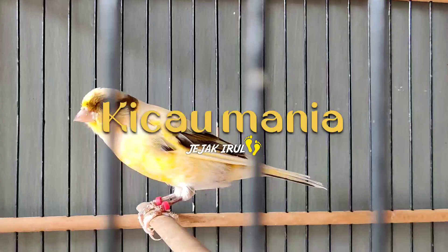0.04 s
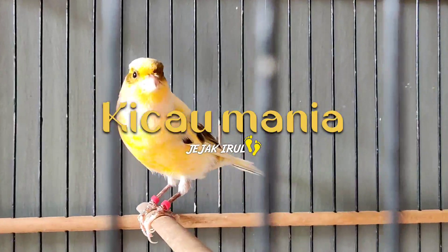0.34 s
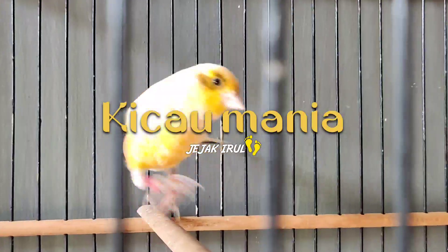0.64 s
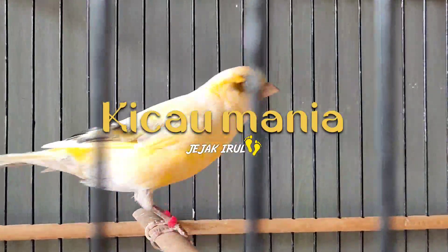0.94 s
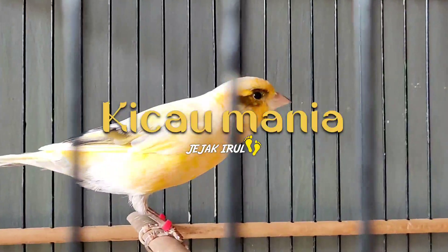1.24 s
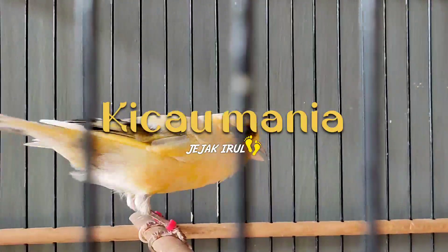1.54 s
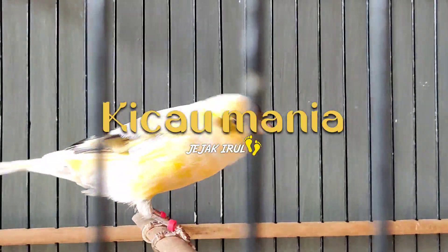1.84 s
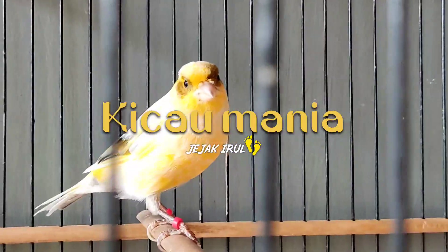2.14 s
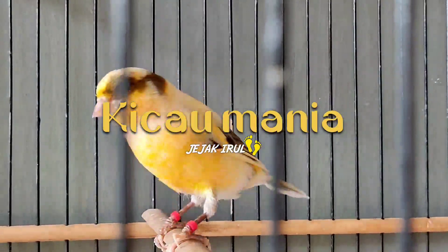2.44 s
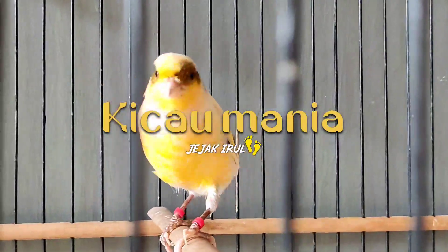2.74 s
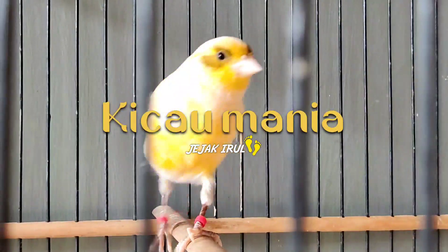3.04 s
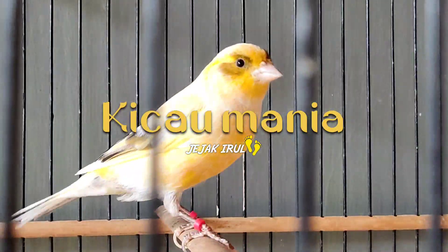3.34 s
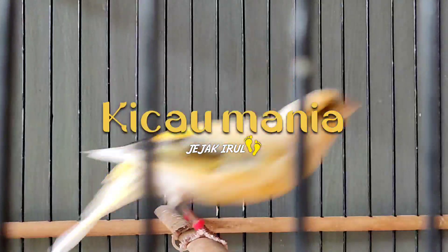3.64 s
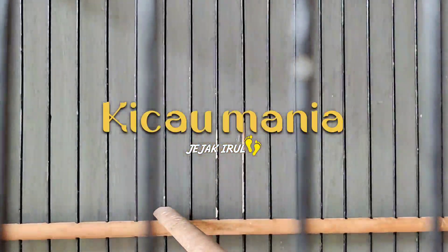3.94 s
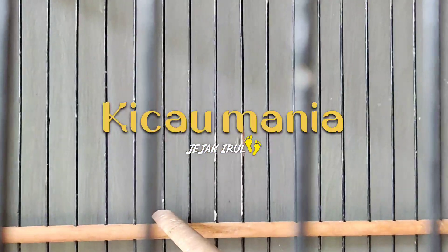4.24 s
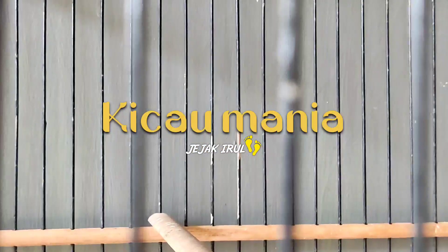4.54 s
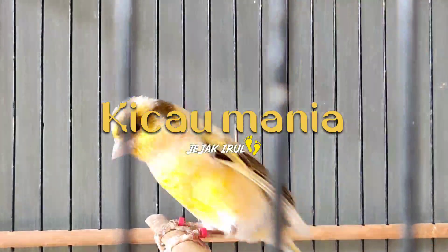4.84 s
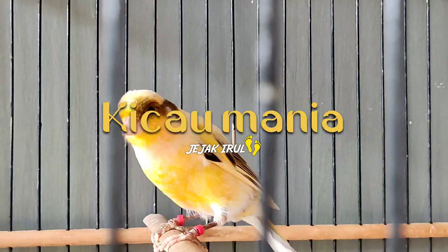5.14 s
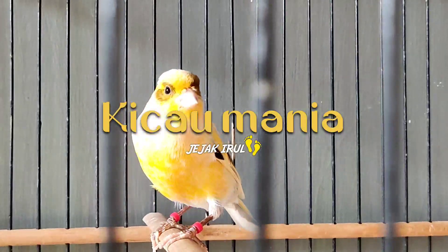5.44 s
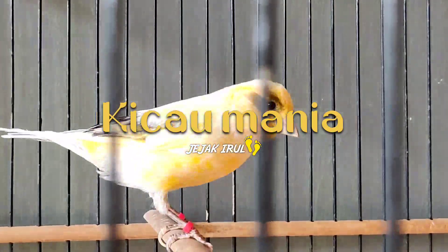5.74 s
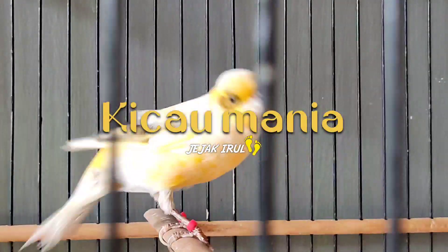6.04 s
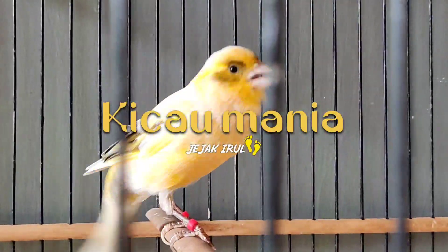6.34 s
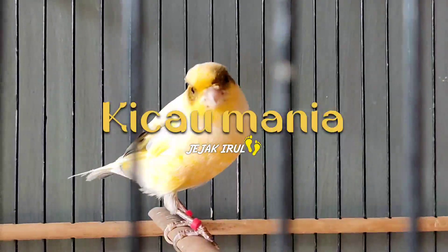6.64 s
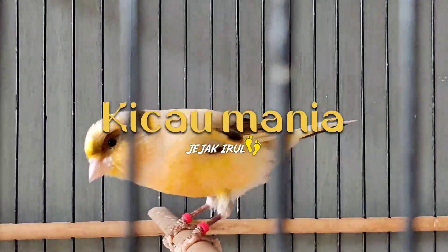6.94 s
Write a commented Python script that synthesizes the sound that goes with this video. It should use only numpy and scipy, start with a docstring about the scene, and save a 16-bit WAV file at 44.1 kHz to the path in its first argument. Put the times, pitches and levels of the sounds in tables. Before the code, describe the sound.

Two loud upward-sweeping canary calls, with feather rustles, claw ticks, wing flutters and soft chirps between, above a steady low throb.

```python
"""A low throb, rustling feathers and a bang across the room; then a caged canary, close to a two-port
microphone, gives two loud rising "sweet" calls, swept up an octave by the tightening membranes of its
syrinx. Between them it shuffles, claws ticking, flutters off its perch and back, and adds softer,
echoing short notes. Cage walls and the room answer. The throb is a machine, perhaps a pump, thudding
through about twelve turns a second under the room's hiss."""
import sys
import numpy as np
from scipy import signal
from scipy.fft import rfft, irfft, next_fast_len
from scipy.io import wavfile
from scipy.ndimage import map_coordinates

SR = 44100
rng = np.random.default_rng(int(sys.argv[2]) if len(sys.argv) > 2 else 0)


def master(y):
    """Save y as 16-bit WAV."""
    cut = np.clip(np.atleast_2d(y).T, -1, 1)
    pcm = np.round(cut * 32767)  # scale
    wavfile.write(sys.argv[1], SR, pcm.astype(np.int16))


N = 308259


# the loud calls: (time [s], length [s], attack [s], whistle level [dB], overtone level [dB],
# overtone fade [dB/s], room send [dB], left lead [ms])
SWEET_CALLS = [(1.574, .325, .02, -18, -26.5, 55, -13, -.11), (6.4, .232, .019, -20, -23.5, 190, -14, .25)]
# two clipped notes: (time [s], length [s], start pitch [Hz], end pitch [Hz], level [dB], buzz [share])
CLOSING_NOTES = [(1.895, .019, 4040, 3900, -21.5, .008), (1.908, .026, 2760, 3100, -29, .012)]

def canary():
    """Two calls from different places on the perch; the first ends in two clipped notes."""
    closing = whistles(CLOSING_NOTES, second_db=-13, third_db=-9)
    out = placed(cage(closing, echo_db=4, reach_s=.018), lead_ms=SWEET_CALLS[0][-1])
    room_send = amp(-13.5) * closing
    for start, *shape, send_db, lead_ms in SWEET_CALLS:
        voice = np.zeros(N)
        add(voice, start, sweet_call(*shape))
        out += placed(cage(voice, echo_db=4, reach_s=.018), lead_ms)
        room_send += amp(send_db) * voice
    return out + room(room_send)


SLACK_HZ, TIGHT_HZ, GLIDE_MID_S, GLIDE_S = 1000, 2290, .0445, .0195
ARCH_TOP_S, ARCH_SHARE_PER_S, WAVER_SHARE = .185, .4, .006
CREST_S, SWELL_DB_PER_S, FADE_DB_PER_S = .07, 210, 70
HARSH_DB, DIP_DB, DIP_AT_S, DIP_S, HOLD_S, RELEASE_S = 4, 6, .084, .014, .15, .008
GAPE_HZ, GAPE_WIDTH_HZ, GAPE_DB = 6200, 1300, 8  # a resonance open only at the start of a call
# resonances of throat and beak: (frequency [Hz], gain [dB])
THROAT_EQ = [(1000, -18.5), (2080, -12), (2450, -0.5), (3600, 0.5), (4500, 6.5), (5400, -6), (6450, 1.5),
             (7500, -7.5), (8850, 8), (9900, 0), (11200, 6.5), (12300, -1), (13600, -3), (14500, -36)]

def sweet_call(length, attack, whistle_db, overtone_db, overtone_fade, jitter=.007, rasp=.009):
    """Both sides of the syrinx sweep up an octave, one a little flat; the throat shapes the harmonics."""
    t = np.arange(int(length * SR)) / SR
    gate = np.clip(np.minimum(t / attack, (length - t) / RELEASE_S), 0, 1) ** 2
    # an S-curve from slack to tight membranes; the held pitch arches and wavers
    glide = SLACK_HZ + (TIGHT_HZ - SLACK_HZ) / (1 + np.exp((GLIDE_MID_S - t) / GLIDE_S))
    pitch = glide * (1 - ARCH_SHARE_PER_S * np.abs(t - ARCH_TOP_S) + WAVER_SHARE * wobble(60, len(t)))
    slack = 1 / (1 + (pitch / 1720) ** 10)
    # the whistle crests near the top of the glide
    low_db = whistle_db - np.maximum(SWELL_DB_PER_S * (CREST_S - t), FADE_DB_PER_S * (t - CREST_S))
    # the overtones start harsh, dip just after the crest, return, and fade after a hold
    dip_db = DIP_DB * np.exp(-((t - DIP_AT_S) / DIP_S) ** 2)
    high_db = overtone_db + HARSH_DB * slack - dip_db - overtone_fade * np.maximum(t - HOLD_S, 0)
    high_band = lambda hz: 1 / (1 + (5500 / (hz + 1)) ** 20)
    low_band = lambda hz: 1 - high_band(hz)
    harmonics = np.arange(1, 14)[:, None]

    def membrane(hz):
        """One side of the syrinx: while slack it flaps unevenly, and harmonics flare and drop out."""
        partials = harmonics * hz
        gape_db = GAPE_DB * slack * np.exp(-((partials - GAPE_HZ) / GAPE_WIDTH_HZ) ** 2)
        gains = amp(along(THROAT_EQ, partials) + gape_db) * (partials < SR / 2)
        fader = lambda band, db: band * amp(db) / np.sqrt(np.sum((gains * band) ** 2, 0) / 2)
        balance = fader(low_band(partials), low_db) + fader(high_band(partials), high_db)
        uneven_hz = hz * (1 + (jitter + rasp * slack) * wobble(695, len(t)))
        phase = 2 * np.pi * np.cumsum(uneven_hz) / SR
        flicker = np.array([wobble(130, len(t)) for _ in harmonics])
        flare = amp((1.5 + 2.5 * slack) * flicker - 2 * slack)
        return np.sum(gains * balance * flare * np.sin(harmonics * phase), 0)

    # the flatter side joins once the membranes are tight, and is duller
    flat_side = filtered((1 - slack) * membrane(.932 * pitch), lambda hz: amp(-5.5 - 2.2 * high_band(hz)))
    # air hisses through the same throat, most while the membranes are slack
    air = lambda band: noise(len(t), lambda hz: amp(along(THROAT_EQ, hz)) * band(hz))
    breath = amp(low_db - 5) * air(low_band) + amp(high_db + 2.5) * air(high_band)
    return gate * (membrane(pitch) + flat_side + amp(-12) * (1 + slack) * breath)


# soft song: (time [s], length [s], start pitch [Hz], end pitch [Hz], relative level [dB], buzz [share])
SOFT_NOTES = [(0, .04, 4940, 4560, -58, .01), (5.117, .036, 3515, 3485, -47, .012),
              (5.157, .06, 4680, 4620, -51, .022), (5.21, .075, 4840, 4850, -50.5, .045),
              (5.285, .06, 5060, 5180, -52.5, .028)]

def soft_notes():
    """The canary's faint chirp, later a clear note and buzzing higher ones, all wet with room reverb."""
    voice = whistles(SOFT_NOTES, second_db=-12, third_db=-7)
    return amp(5) * voice + amp(9) * room(voice)


def whistles(rows, second_db, third_db):
    """Short gliding notes with two overtones, each an arch in level; fast pitch flutter makes them buzz."""
    out = np.zeros(N)
    for start, length, start_hz, end_hz, db, buzz in rows:
        progress = np.linspace(0, 1, int(length * SR), endpoint=False)
        hz = start_hz + (end_hz - start_hz) * progress
        phase = 2 * np.pi * np.cumsum(hz * (1 + buzz * wobble(1200, len(hz)))) / SR
        overtones = sum(amp(level) * np.sin(k * phase) * (k * hz < 13000)
                        for k, level in [(2, second_db), (3, third_db)])
        arch = np.sqrt(np.sin(np.pi * progress))
        add(out, start, amp(db) * arch * (np.sin(phase) + overtones))
    return out


# claws and beak on wire and wood: (time [s], relative level [dB], body at 2 kHz [dB])
CLAW_TICKS = [(0.7592, -31, -22), (2.4634, -27.5, -22), (3.1857, -35, -24), (3.2051, -25, -11),
              (3.7804, -30, -26), (3.9516, -22.5, -19), (4.7198, -21.5, -38), (4.8085, -27, -23),
              (4.894, -17.5, -38), (5.685, -24, -27), (5.7184, -30, -19), (6.904, -32, -23)]
# feet landing: (time [s], relative level [dB], upper mode gain [dB])
LANDINGS = [(1.614, -45, -25), (2.477, -44, -10), (3.221, -41, -15), (3.833, -48, 6.5), (4.849, -47.5, -1),
            (4.91, -37.5, -12), (5.735, -46, -10)]
# the perch's ring: (frequency [Hz], relative level [dB], 60 dB decay [s])
PERCH_MODES = [(396, -5, 0.13), (884, 6, 0.034), (1570, 2, 0.02), (2220, 5, 0.021)]

def feet():
    """Claws tick and scrape; each landing rings the wooden perch with its own brightness."""
    out, t = np.zeros(N), np.arange(SR // 6) / SR
    for start, db, body_db in CLAW_TICKS:
        eq = [(600, -31), (2000, body_db), (5000, -11.5), (9000, 5), (14000, 0)]
        scratch = noise(len(t), lambda hz: amp(along(eq, hz)))
        add(out, start, amp(db - 4) * strike(t, attack=.0015, t60=.028) * scratch)
    for start, db, upper_db in LANDINGS:
        ring = sum(amp(level + upper_db * (k > 0)) * strike(t, .003, t60) * np.sin(2 * np.pi * hz * t)
                   for k, (hz, level, t60) in enumerate(PERCH_MODES))
        add(out, start, amp(db + 5) * ring)
    return cage(out, echo_db=-5, reach_s=.008) + amp(-16) * room(out)


# the bird's moves: (peak time [s], level [dB], 20 dB rise [s], 20 dB fall [s])
RUSTLE_SWELLS = [(.15, -47, .5, .25), (.83, -43, .14, .35), (.96, -47, .12, .22), (1.16, -52, .05, .2),
                 (1.29, -55, .05, .3), (2.24, -43, .11, .15), (2.47, -47, .04, .05), (2.75, -46, .1, .16),
                 (2.98, -48, .22, .35), (3.21, -49, .2, .2), (3.45, -53, .4, .3), (3.66, -41.5, .25, .3),
                 (3.8, -38.5, .035, .2), (3.96, -46, .03, .08), (4.71, -48.5, .55, .09),
                 (4.84, -43.5, .07, .13), (5.26, -44.5, .28, .24), (5.72, -45.5, .06, .15),
                 (6.35, -54, .2, .15), (6.99, -43, .13, .1)]
# colour of the rustle: (frequency [Hz], gain [dB])
FEATHER_EQ = [(710, -56), (1200, -16.5), (2220, -5.5), (2910, -9.5), (5110, -12.5), (6360, -8),
              (8880, -2.5), (10200, -5), (11400, -2), (13600, -6), (14500, -73)]
# wing beats: (time [s], level [dB])
WING_BEATS = [(3.64, -52), (3.7, -53), (3.79, -49), (3.835, -41.5), (4.81, -46.5), (4.851, -43),
              (4.915, -40)]

def feathers():
    """Barbs brush in tiny clumps as each move swells and dies; each wing beat pushes a puff of air."""
    t = np.arange(N) / SR
    power = sum(amp(db - 20 * np.maximum((peak - t) / rise, (t - peak) / fall)) ** 2
                for peak, db, rise, fall in RUSTLE_SWELLS)
    clumps = unit(amp(2.5 * wobble(500, N)))
    rustle = np.sqrt(power) * clumps * stereo_noise(FEATHER_EQ)
    beats = sum(amp(db) * np.exp(-((t - peak) / .024) ** 2) for peak, db in WING_BEATS)
    puff_eq = [(40, 19.5), (150, 10), (300, 2), (900, -6), (2200, -5), (4500, -13), (12000, -13)]
    return rustle + beats * stereo_noise(puff_eq)


# a quick run of blows: (time [s], relative level [dB], low-pass cutoff [Hz])
BANG_BLOWS = [(.531, -29, 500), (.549, -28, 2500), (.561, -31, 3000), (.571, -32, 2500),
              (.635, -35.5, 1200)]
# their wooden body: (frequency [Hz], gain [dB])
WOOD_EQ = [(120, -25), (200, -7.5), (400, -4), (650, -4.5), (1000, -6.5), (1500, -8.5), (2300, -9),
           (4000, -17.5), (6000, -18.5), (9000, -8), (13000, -13)]

def bang():
    """Something wooden clatters shut across the room, each blow with its own brightness."""
    out, t = np.zeros(N), np.arange(SR // 8) / SR
    for start, db, cutoff_hz in BANG_BLOWS:
        blow = noise(len(t), lambda hz: amp(along(WOOD_EQ, hz)) / np.sqrt(1 + (hz / cutoff_hz) ** 2))
        add(out, start, amp(db) * strike(t, attack=.0032, t60=.084) * blow)
    return amp(5) * out + amp(7) * room(out)


# the machine's pace: (time [s], speed [turns/s])
MACHINE_PACE = [(0, 12.05), (.53, 11.35), (.85, 11.6), (1.76, 11.63), (2.93, 11.225), (3.5, 11.59),
                (4.54, 11.565), (5.37, 12.615), (6, 11.765), (7, 12.31)]
# low modes jolted in every turn: (delay [s], frequency [Hz], level [dB], 60 dB decay [s])
MACHINE_THUDS = [(.0024, 106.4, -28, 0.085), (.022, 76, -63.5, 0.3), (0.023, 206.8, -40, 0.15),
                 (.032, 44.7, -35, 0.14), (0.0324, 145.7, -38, 0.087)]

def machine():
    """Every turn repeats the same uneven run of low thuds, each varying a little in level."""
    speed = np.interp(np.arange(N) / SR, *np.transpose(MACHINE_PACE))
    turns = .66 + np.cumsum(speed) / SR
    starts = np.flatnonzero(np.diff(np.floor(turns))) / SR
    out, t = np.zeros(N), np.arange(SR // 4) / SR
    for delay, hz, db, t60 in MACHINE_THUDS:
        thud = amp(db) * strike(t, attack=.0069, t60=t60) * np.sin(2 * np.pi * hz * t)
        for start in starts:
            add(out, start + delay, amp(rng.normal(0, 1)) * thud)
    return out


def cage(x, echo_db, reach_s, count=14):
    """Direct sound plus quick echoes from the tray, the bars and the wall behind."""
    echoes = np.zeros((2, SR // 10))
    for channel in echoes:
        lateness = rng.random(count)
        taps = ((.001 + lateness * reach_s) * SR).astype(int)
        channel[taps] = rng.choice([-1, 1], count) * np.exp(-2 * lateness)
        channel *= amp(echo_db) / np.linalg.norm(channel)
    echoes[:, 0] = 1
    return convolved(x, echoes)


# reverb time: (frequency [Hz], 60 dB decay [s])
ROOM_DECAY = [(200, 0.53), (1000, 0.59), (4500, .65), (9000, 0.44), (14000, 0.36)]

def room(x):
    """The room's diffuse answer; each frequency dies at its own speed."""
    hz, t, bands = signal.stft(rng.standard_normal((2, SR)), SR, nperseg=256)
    decay = strike(t, attack=.0023, t60=along(ROOM_DECAY, hz)[:, None])
    _, tail = signal.istft(bands * decay, SR, nperseg=256)
    return convolved(x, tail)


# colour of the room tone: (frequency [Hz], gain [dB])
ROOM_TONE_EQ = [(30, -12), (50, -1.5), (90, -1.5), (200, -7), (290, -19.5), (410, -12.5), (760, -17.5),
                (890, -13), (1100, -26), (1400, -22), (2200, -18.5), (4500, -29.5), (9000, -22.5),
                (11500, -27), (14500, -36.5)]

def room_tone():
    """A steady bed of soft rumble and hiss."""
    return amp(-50) * stereo_noise(ROOM_TONE_EQ)


# stereo image of the noise: (frequency [Hz], left-right correlation [0 to 1])
STEREO_LIKENESS = [(100, 0.86), (300, 0.73), (650, 0.42), (1400, 0), (3000, 0), (7000, 0.75), (14000, 0.61)]

def stereo_noise(eq):
    """Coloured noise of rms 1, narrow in the bass and the top treble, wide in the mids."""
    def colour(hz):
        width = np.arccos(along(STEREO_LIKENESS, hz)) / 2
        return amp(along(eq, hz)) * [np.cos(width), np.sin(width)]

    mid, side = filtered(rng.standard_normal((2, N)), colour)
    return unit(np.array([mid + side, mid - side]))


def placed(pair, lead_ms):
    """A source off to one side reaches the left port a little earlier or later."""
    return filtered(pair, lambda hz: np.exp(1j * np.pi * np.outer([1, -1], hz) * lead_ms / 1000))


def amp(db):
    """Decibels to gain."""
    return 10 ** (np.asarray(db) / 20)


def unit(x):
    """Scale to rms 1."""
    return x / np.sqrt(np.mean(x ** 2) + 1e-20)


def along(points, hz):
    """Read (frequency, value) points on a log axis."""
    knots, values = np.transpose(points)
    return np.interp(np.log(hz + 1), np.log(knots + 1), values)


def strike(t, attack, t60):
    """Percussive envelope: a quick rise, then 60 dB down every t60 seconds."""
    return (1 - np.exp(-t / attack)) * amp(-60 * t / t60)


def wobble(rate, size):
    """A smooth random curve, rate knots a second."""
    return map_coordinates(rng.standard_normal(int(size * rate / SR) + 4), [np.arange(size) * rate / SR])


def noise(size, response):
    """Filtered mono noise of rms 1."""
    return unit(filtered(rng.standard_normal(size), response))


def filtered(x, response):
    """Shape x by a gain given as a function of frequency."""
    size = x.shape[-1]
    padded = next_fast_len(size + 8192)
    return irfft(rfft(x, padded) * response(np.fft.rfftfreq(padded, 1 / SR)), padded)[..., :size]


def convolved(x, impulse):
    """Play a mono track through a normalised stereo impulse response."""
    return signal.fftconvolve(x[None], impulse / np.linalg.norm(impulse[0]), axes=1)[:, :N]


def add(track, start, sound):
    """Mix a sound into a track at start seconds."""
    part = track[round(start * SR):][:len(sound)]
    part += sound[:len(part)]


def scene():
    """The canary, cage noises, the bang, the machine and the room tone."""
    return canary() + soft_notes() + feet() + feathers() + bang() + machine() + room_tone()


BAND_LIMIT_HZ = 14450
# balance of the microphone's ports: (frequency [Hz], left minus right [dB])
PORT_BALANCE = [(300, 1), (1300, -2), (2400, -1), (4300, -0.5), (8000, -2), (9500, -10), (11000, 15.5),
                (14000, 8)]

def record(dry):
    """The microphone sheds the lowest bass and the highest treble; its right port is duller at the top."""
    sound = signal.sosfilt(signal.butter(4, 31, "highpass", fs=SR, output="sos"), dry)
    ports = lambda hz: amp(np.outer([1, -1], along(PORT_BALANCE, hz)) / 2)
    return filtered(sound, lambda hz: ports(hz) / np.sqrt(1 + (hz / BAND_LIMIT_HZ) ** 200))


dry = scene()
out = record(dry)
master(out)
```